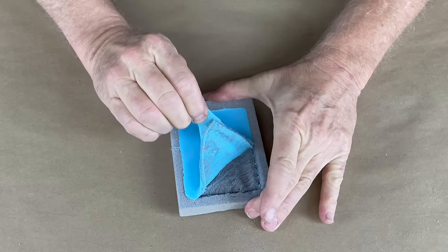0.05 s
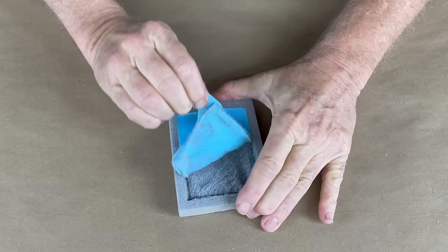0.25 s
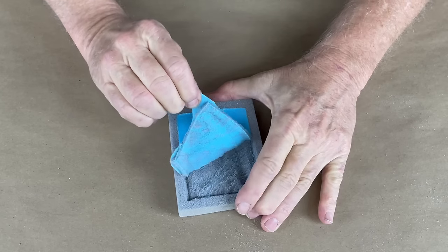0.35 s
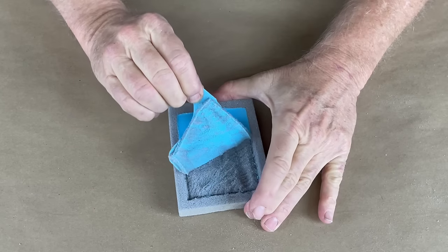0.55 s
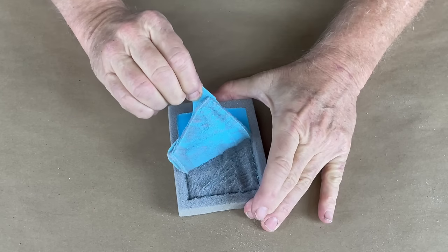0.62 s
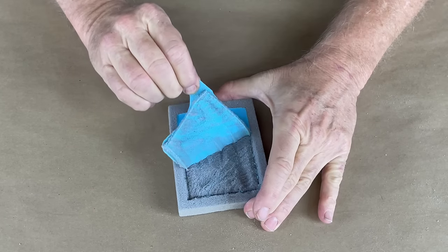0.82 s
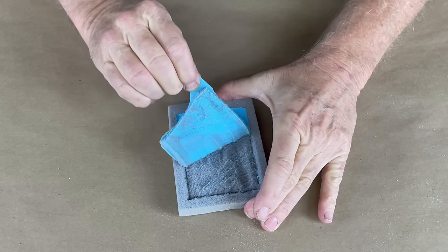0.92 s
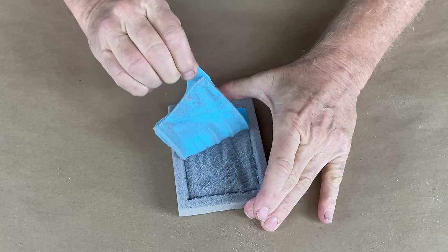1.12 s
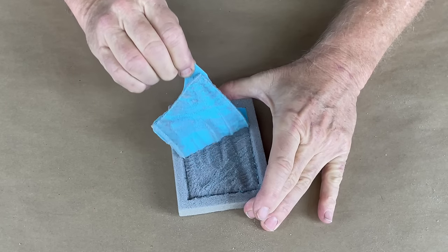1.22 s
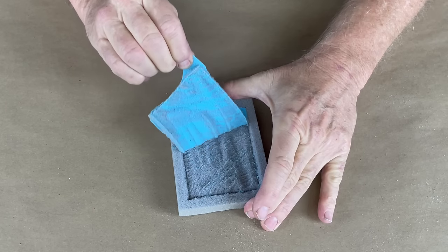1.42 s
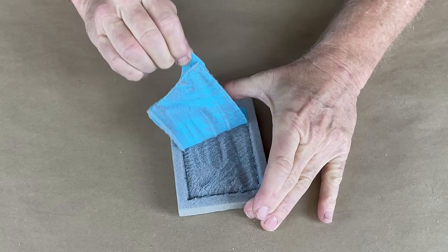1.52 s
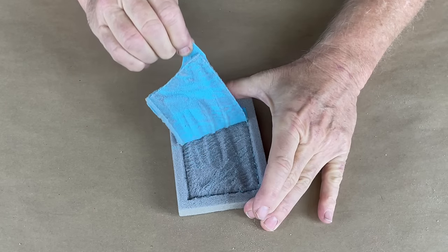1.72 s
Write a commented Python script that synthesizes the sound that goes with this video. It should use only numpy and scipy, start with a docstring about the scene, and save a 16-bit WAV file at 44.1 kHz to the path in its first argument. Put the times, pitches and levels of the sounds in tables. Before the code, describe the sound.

Rubber mold peeling off rigid foam, close up in a small room with faint steady hiss. Very quiet ticks and a soft rub until 0.2 s, then a loud rip at 0.25-0.3 s with snaps to 0.45 s, including barely audible squeaks. A sparse lull follows; dense crackling snaps return at 0.73-0.87 s, strongest again around 1.05-1.15 s, then irregular pops and small tears continue to about 1.75 s.

```python
"""Peeling a rubber mold

A rubber mold is slowly peeled off rigid foam in a small room: scattered snaps, a soft rub and, as a stuck
corner lets go, one loud rip among short tears, then many more snaps and tears over a fine crackle.
Snaps and rips are noise bursts, the crackle is noise shaped by random breaks; filters colour them all.
The freed rubber squeaks faintly in gliding tones; echoes and a steady hiss make up the room."""
import sys
import numpy as np
from scipy import signal
from scipy.fft import rfft, irfft, next_fast_len
from scipy.io import wavfile
from scipy.ndimage import uniform_filter1d

SR = 44100
rng = np.random.default_rng(int(sys.argv[2]) if len(sys.argv) > 2 else 0)


def inscribe(sig):
    """Save sig as 16-bit PCM at rate SR to the path in sys.argv[1].

    A 1-D sig is mono; a 2-D sig holds one channel per row.
    Samples are clipped to [-1, 1] before scaling.
    """
    pcm = np.round(np.clip(np.atleast_2d(sig).T, -1, 1) * 32767)
    wavfile.write(sys.argv[1], SR, pcm.astype(np.int16))


N = 77175  # length in samples

# Single snaps of the bond; SNAP_DB is added to the level
# [t/s, level/dB, extra body/dB, hollow ring f/Hz, extra treble/dB]
SNAP_EVENTS = [(0.0054, -40.5, -11, 2300, -9), (0.0423, -40.5, -5, 1240, 2), (0.1418, -36.5, -5.5, 2060, 0),
               (0.2352, -24.5, -13, 1210, -4), (0.2513, -16.5, -5, 1240, -17),
               (0.3402, -22.5, 5.5, 1290, 3), (0.3868, -31, 7, 1600, -7), (0.4133, -29, 2, 1250, -13),
               (0.4308, -26.5, -7, 850, -12), (0.4459, -24.5, -3.5, 1180, -2), (0.5093, -43, 0, 850, -9),
               (0.5497, -34, -14, 1700, -11), (0.5626, -32, -13.5, 1730, -23),
               (0.661, -37, -4.5, 1660, -23), (0.6865, -30, -10.5, 1630, -6), (0.7281, -30, -5, 1530, 3),
               (0.7347, -28, 6, 1590, -10), (0.753, -32, -9, 3060, -6), (0.7769, -26.5, -16, 2150, -3),
               (0.7928, -22, -8, 1430, -25), (0.7952, -27, 5.5, 1350, 6), (0.8115, -27, 6.5, 1190, -1),
               (0.821, -25, 3, 1350, 3), (0.8314, -25.5, 14.5, 1120, 1), (0.8389, -35, -2, 487, 5),
               (0.8996, -30, -10, 3100, -17), (0.9347, -34.5, -14, 3630, 9), (0.9631, -33.5, -9, 2300, -2),
               (0.984, -33.5, -14, 2300, -15), (1.0194, -30.5, -4.5, 483, -8),
               (1.0683, -24, 1.5, 2020, -10), (1.0865, -23.5, 0, 494, 4), (1.093, -36, 6, 486, -3),
               (1.1032, -22.5, -1.5, 490, -1), (1.1418, -19, 5, 2270, 8.5), (1.1576, -26, 15, 2300, -13),
               (1.1888, -26.5, -1, 490, -11), (1.1932, -24.5, -6, 490, -5), (1.209, -31, -8, 2210, -6),
               (1.2196, -25.5, -6.5, 2140, -13), (1.2256, -24, -1.5, 2300, -14),
               (1.2568, -22.5, -4.5, 4420, -2), (1.3024, -27, -4.5, 2280, 2),
               (1.3262, -28.5, -2.5, 2170, 3), (1.3438, -21, -7.5, 595, 4), (1.3811, -18.5, -10, 485, -8),
               (1.3941, -25, -11, 496, -2), (1.4211, -29, -8, 4610, -3), (1.4699, -28.5, -5, 1330, -4),
               (1.4857, -31.5, -10, 2200, 0), (1.5481, -34, -4, 1130, 7), (1.567, -35.5, -2, 1100, 4),
               (1.6254, -33, 0, 503, -1), (1.6361, -33, 4, 1960, -2), (1.6521, -22.5, -2.5, 1310, -1),
               (1.7113, -27, -2, 1350, 7), (1.7177, -32, 10, 1310, 16), (1.725, -29.5, 4, 1800, -7),
               (1.7398, -30, -15, 490, -15)]
# Rips, where a whole patch lets go; RIP_DB is added to the level
# [t/s, length/s, level/dB, extra body/dB, extra thud/dB, hollow ring f/Hz, ring/dB, extra treble/dB]
RIP_EVENTS = [(0.2464,0.0062,-18.5,-11,-4,1360,22,-5),(0.2835,0.0019,-21.5,-3,-0.5,1180,14,-13),(0.2987,0.0096,-10,-4,0,696,9,-4),(0.871,0.0021,-28,2,1.5,1446,7.5,0),(1.065,0.0034,-24,-6,-20,3080,4.5,-11),(1.081,0.0092,-32.5,-3,3,435,10.5,-7),(1.115,0.003,-29,-1.5,3.5,1250,4,0),(1.137,0.011,-22.5,-5,-3,2220,12,-5),(1.352,0.0077,-27.5,-3,8.5,2370,-1,-4),(1.4489,0.0013,-21,-9,2.5,2880,4,-8.5),(1.617,0.0045,-27.5,5,-5.5,527,9.5,7),(1.6983,0.0027,-29,-8,1,1860,11,1)]
# Pull along the peel line, as crackle loudness; CRACKLE_DB is added [t/s, level/dB]
PEEL_PULL = [(0,-58.5),(.13,-55.5),(.185,-47),(.22,-49.5),(.262,-43.5),(.34,-36.5),(0.441,-46.5),(.48,-52),(.57,-53),(.6,-60.5),(0.634,-49.5),(0.722,-51.5),(0.734,-34),(.77,-44),(0.811,-31),(.86,-42.5),(.93,-42.5),(1.029,-44),(1.1,-31.5),(1.128,-40.5),(1.15,-36.5),(1.22,-41.5),(1.29,-44.5),(1.32,-44),(1.355,-41.5),(1.41,-41.5),(1.475,-43.5),(1.52,-50),(1.571,-37.5),(1.602,-47.5),(1.63,-37),(1.75,-44)]
# Spectrum of a breaking foam cell [f/Hz, level/dB]
CELL_SPECTRUM = [(30,-37.5),(100,-28),(200,-25.5),(310,-10.5),(650,-7.5),(950,-6),(1500,-2),(3000,1.5),(4000,-3.5),(5500,-1.5),(7000,1),(9500,-0.5),(11000,-8.5),(14500,-11),(16000,-24)]
# Resonances that colour every crack [f/Hz, width/Hz, boost/dB]
CRACK_RESONANCES = [(1288,120,5),(2320,160,3),(4580,210,5),(7874,960,12)]
# Room tail; t60 is the time to fade by 60 dB [f/Hz, level/dB, t60/s]
ROOM_TAIL = [(154,0,0.25),(500,-13,0.82),(840,-14.5,0.67),(2020,-19,0.88),(4280,-9.5,0.43),(7400,-18,.42),(15000,-2.5,0.1)]
# Shape of the background spectrum; FLOOR_DB sets its loudness [f/Hz, relative level/dB]
FLOOR_SPECTRUM = [(25,0),(60,-7.5),(150,0.5),(300,3.5),(700,-7),(1500,2),(4000,-5.5),(8000,13),(11000,-3),(16000,-3)]
# Faint singing of the freed flap [t/s, length/s, start f/Hz, end f/Hz, level/dB]
FLAP_SQUEAKS = [(0.411,0.1205,960,829,-62),(0.443,0.053,500,590,-64.5)]
# Pockets of different size under the rubber [ring f/Hz]
POCKET_RINGS = [1350, 2300, 5650]

# Colour of a crack: thud lies around, body below and treble above these pitches
THUD_HZ, BODY_HZ, TREBLE_HZ = 380, 4860, 10700
RING_WIDTH = 0.34  # width of the ring in the gap under the rubber, as a share of its pitch

# Bursts
LEAD_S = 0.004  # room for the build-up ahead of each burst
GRAIN_DB = 3.5  # scatter of the fractures within a burst
SNAP_ATTACK_S, SNAP_HOLD_S, SNAP_DECAY_S, SNAP_DB = 0.00066, 0.00066, 0.0008, -1
SNAP_THUD_DB, SNAP_RING_DB = 0, 10.5
RIP_ATTACK_S, RIP_DECAY_S, RIP_DB, RIP_SAG_DB = 0.0015, 0.0031, 0.5, 1.5

# Crackle
CELLS_PER_S, CELL_SCATTER_DB, CELL_DECAY_S, CRACKLE_DB = 400, 3.5, 0.0015, -0.5
FIZZ_DB = -4.5  # the smallest cells
LIGHT_BODY_DB, LIGHT_THUD_DB, LIGHT_TREBLE_DB = -7, -12.5, -6.5  # colour under a light pull
HARD_BODY_DB, HARD_THUD_DB, POCKET_RING_DB = -4, 1.5, 5  # colour under a hard pull

# Rub: the rubber stretches before the corner gives; RUB_S is the middle of the swell
RUB_S, RUB_WIDTH_S, RUB_DB = 0.19, 0.016, -43
RUB_BODY_DB, RUB_THUD_DB, RUB_TREBLE_DB = -26, -10, -10

EARLY_DB, EARLY_DECAY_S = -11, 0.0031  # echoes from table top and hands
FLOOR_DB = -59  # loudness of the background
TOP_HZ = 15800  # upper limit of the finished sound


def undb(db):
    """Turn decibels into a plain gain."""
    return 10 ** (np.asarray(db) / 20)


def unit(x):
    """Scale to an rms (average strength) of 1."""
    return x / np.sqrt(np.mean(x ** 2) + 1e-18)


def on_log(hz, table):
    """Read levels from a spectrum table, spacing pitches by ratio as the ear does."""
    table = np.array(table, float)
    return np.interp(np.log(hz + 1), np.log(table[:, 0]), table[:, 1])


def crack(body_db, thud_db, ring_hz=1300, ring_db=0, treble_db=0, size=512):
    """How foam, rubber and the gap between them answer one fracture, as a filter of unit energy."""
    hz = np.fft.rfftfreq(size, 1 / SR)
    db = on_log(hz, CELL_SPECTRUM)
    db = db + body_db / (1 + (hz / BODY_HZ) ** 4)
    db = db + treble_db * (1 - 1 / (1 + (hz / TREBLE_HZ) ** 10))
    db = db + thud_db * np.exp(-np.log((hz + 1) / THUD_HZ) ** 2)
    peaks = list(CRACK_RESONANCES) + [(ring_hz, RING_WIDTH * ring_hz, ring_db)]
    for peak_hz, width_hz, boost_db in peaks:
        db = db + boost_db / (1 + (2 * (hz - peak_hz) / width_hz) ** 2)
    # Folding the cepstrum (spectrum of the log spectrum) puts the answer after the fracture
    cepstrum = irfft(np.log(undb(db)))
    cepstrum[1:size // 2] *= 2
    cepstrum[size // 2 + 1:] = 0
    response = irfft(np.exp(rfft(cepstrum)))
    return response / np.linalg.norm(response)


def add(out, x, start_s):
    """Mix x into out at a given time, trimming what falls outside."""
    i = int(start_s * SR)
    x, i = x[max(-i, 0):], max(i, 0)
    out[i:i + len(x)] += x[:len(out) - i]


def burst(hold_s, attack_s, decay_s, sag_db, response):
    """An avalanche of tiny fractures: noise that builds, runs on with an optional sag, and dies."""
    size = 1024 if hold_s < 0.005 else 2048
    t = np.arange(size) / SR - LEAD_S
    build = np.minimum(t, 0) / attack_s
    die = np.maximum(t - hold_s, 0) / decay_s
    shape = np.exp(build - die) * undb(-sag_db * np.clip(t / hold_s, 0, 1))
    push, scatter = rng.standard_normal((2, 2048))[:, :size]
    fractures = shape * push * undb(GRAIN_DB * scatter)
    x = irfft(rfft(fractures) * rfft(response, size))
    return x * np.linalg.norm(shape) / np.linalg.norm(x)  # same energy as the smooth shape


def background():
    """Faint steady hiss of the room: noise shaped by a spectrum table."""
    size = next_fast_len(N, True)
    hz = np.fft.rfftfreq(size, 1 / SR)
    spectrum = rfft(rng.standard_normal(size)) * undb(on_log(hz, FLOOR_SPECTRUM))
    return undb(FLOOR_DB) * unit(irfft(spectrum, size)[:N])


def crackle():
    """Foam cells break at random along the peel line; a harder pull sounds fuller and rings pockets."""
    pull_db = np.interp(np.arange(N) / SR, *np.array(PEEL_PULL).T)
    hard = (pull_db - pull_db.min()) / np.ptp(pull_db)  # 0 = lightest pull, 1 = hardest
    breaks = rng.random(N) < CELLS_PER_S / SR
    scatter = np.clip(rng.standard_normal(N), -2, 2)
    sizes = breaks * undb(CELL_SCATTER_DB * scatter)
    # Each break adds power that fades; dividing by the local average leaves loudness to the pull
    power = signal.lfilter([1], [1, -np.exp(-2 / (CELL_DECAY_S * SR))], sizes ** 2)
    power = power / (uniform_filter1d(power, size=1800) + 1e-9)
    strength = np.sqrt(np.abs(power) + undb(FIZZ_DB) ** 2)
    x = strength * rng.standard_normal(N) * undb(pull_db + CRACKLE_DB)
    # Every break picks a pocket, kept until the next break
    last_break = np.maximum.accumulate(breaks * np.arange(N))
    pocket = rng.integers(len(POCKET_RINGS), size=N)[last_break]
    light_response = crack(LIGHT_BODY_DB, LIGHT_THUD_DB, treble_db=LIGHT_TREBLE_DB)
    out = signal.oaconvolve(x * (1 - hard), light_response)
    for k, hz in enumerate(POCKET_RINGS):
        hard_response = crack(HARD_BODY_DB, HARD_THUD_DB, hz, POCKET_RING_DB)
        out += signal.oaconvolve(x * hard * (pocket == k), hard_response)
    return out[:N]


def snaps():
    """Small spots of the bond break in very short bursts, each ringing the gap under the rubber."""
    out = np.zeros(N)
    for start_s, db, body_db, ring_hz, treble_db in SNAP_EVENTS:
        response = crack(body_db, SNAP_THUD_DB, ring_hz, SNAP_RING_DB, treble_db)
        snap = burst(SNAP_HOLD_S, SNAP_ATTACK_S, SNAP_DECAY_S, 0, response)
        add(out, undb(SNAP_DB + db) * snap, start_s - LEAD_S)
    return out


def rub():
    """Stretching rubber slides on the foam: filtered noise swells softly and fades."""
    swell = np.exp(-0.5 * ((np.arange(N) / SR - RUB_S) / RUB_WIDTH_S) ** 2)
    x = undb(RUB_DB) * swell * rng.standard_normal(N)
    response = crack(RUB_BODY_DB, RUB_THUD_DB, treble_db=RUB_TREBLE_DB)
    return signal.oaconvolve(x, response)[:N]


def rips():
    """Larger patches tear free in one run: bursts that weaken on the way."""
    out = np.zeros(N)
    for start_s, length_s, db, *colour in RIP_EVENTS:
        rip = burst(length_s, RIP_ATTACK_S, RIP_DECAY_S, RIP_SAG_DB, crack(*colour))
        add(out, undb(RIP_DB + db) * rip, start_s - LEAD_S)
    return out


def flap():
    """Faint, rough squeaks of the rubber: gliding tones that waver at random as its tension changes."""
    out = np.zeros(N)
    for start_s, length_s, start_hz, end_hz, db in FLAP_SQUEAKS:
        u = np.linspace(0, 1, int(length_s * SR))  # progress from 0 to 1
        re, im = rng.standard_normal((2, 16))
        rough = np.interp(u, np.linspace(0, 1, len(re)), re + 1j * im)
        pitch_hz = start_hz + (end_hz - start_hz) * u
        tone = (rough * np.exp(2j * np.pi * np.cumsum(pitch_hz) / SR)).real
        swell = 2 * np.sin(np.pi * np.sqrt(u))
        add(out, undb(db) * swell * tone, start_s)
    return out


def even(x):
    """Level out the broad colour of a short noise, keeping its fine grain."""
    spectrum = rfft(x)
    width = int(500 * len(x) / SR)  # smooth over about 500 Hz, twice
    power = uniform_filter1d(uniform_filter1d(np.abs(spectrum) ** 2, width), width)
    return irfft(spectrum / np.sqrt(power + 1e-18), len(x))


def room(x):
    """Add quick reflections from table top and hands, and a tail whose fading depends on pitch."""
    t = np.arange(SR // 2) / SR
    hz = np.fft.rfftfreq(len(t), 1 / SR)
    noise, tail = rfft(rng.standard_normal(len(t))), 0
    log_centres = np.log([row[0] for row in ROOM_TAIL])
    for k, (_, db, t60) in enumerate(ROOM_TAIL):
        band = np.interp(np.log(hz + 1), log_centres, np.eye(len(ROOM_TAIL))[k])  # overlapping bands
        fade = np.exp(-np.log(1000) * t / t60) * (1 - np.exp(-t / 0.0022))  # soft start, then decay
        tail = tail + undb(db) * irfft(noise * band, len(t)) * fade / np.linalg.norm(fade)
    early = rng.standard_normal(len(t)) * np.exp(-t / EARLY_DECAY_S) * (t > 0.002)
    early = even(early)[:len(t) // 2]
    early = np.pad(early, (0, len(t) - len(early)))
    echoes = tail + undb(EARLY_DB) * early / np.linalg.norm(early)
    return x + signal.fftconvolve(x, echoes)[:N]


def scene():
    """The peeling mold in its room, over the steady hiss."""
    peeling = snaps() + rips() + crackle() + rub() + flap()
    return (room(peeling) + background())[None]


def record(dry):
    """Round off the loudest peaks, then cut the treble above TOP_HZ."""
    rounded = 0.92 * np.tanh(dry / 0.88)
    low_pass = signal.ellip(10, 0.2, 70, TOP_HZ, fs=SR, output="sos")
    return signal.sosfilt(low_pass, rounded)


dry = scene()
out = record(dry)
inscribe(out)
```